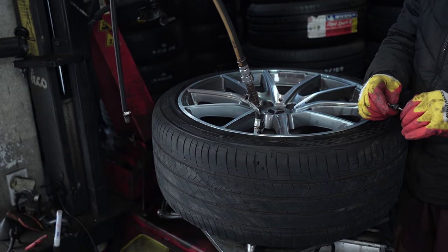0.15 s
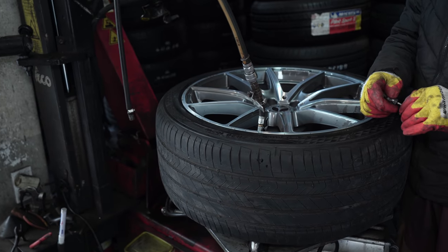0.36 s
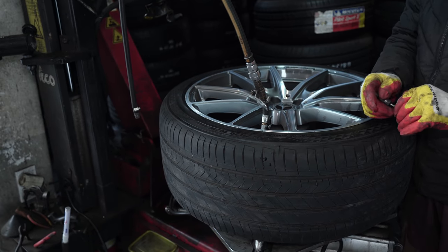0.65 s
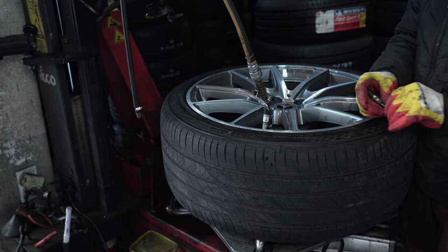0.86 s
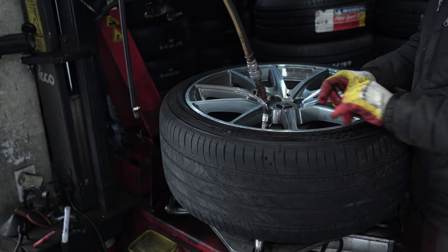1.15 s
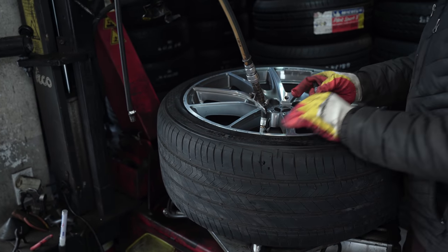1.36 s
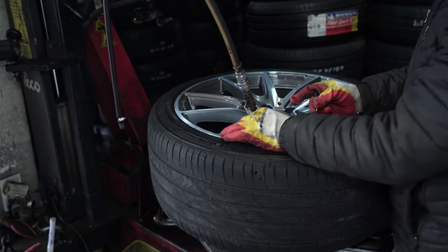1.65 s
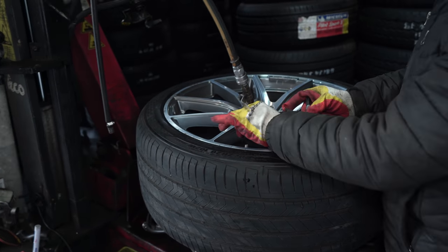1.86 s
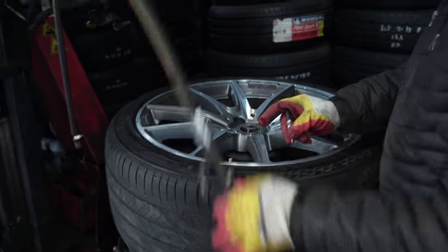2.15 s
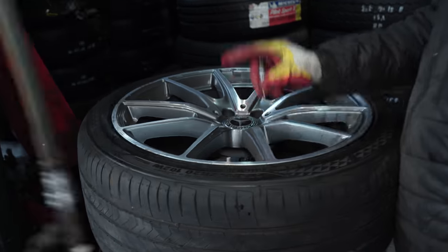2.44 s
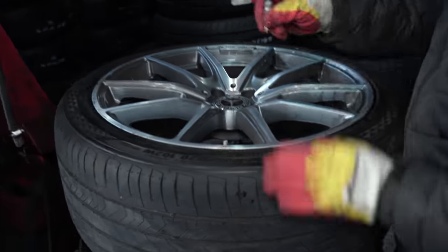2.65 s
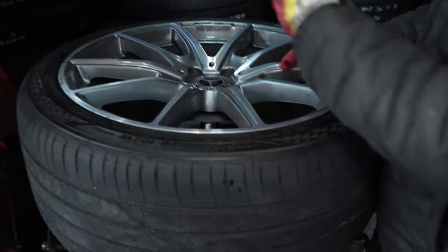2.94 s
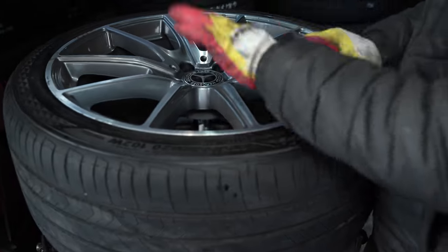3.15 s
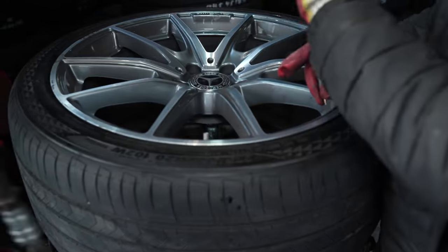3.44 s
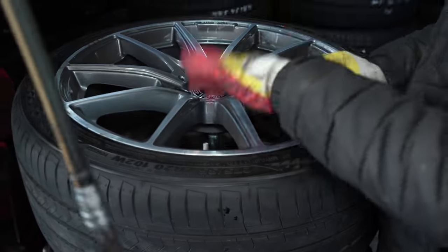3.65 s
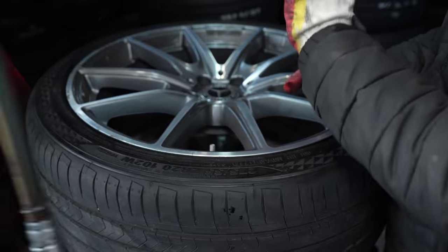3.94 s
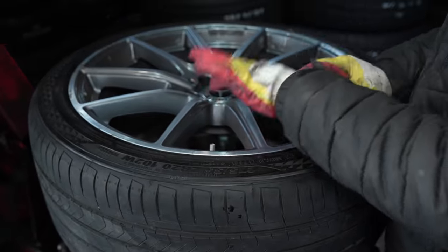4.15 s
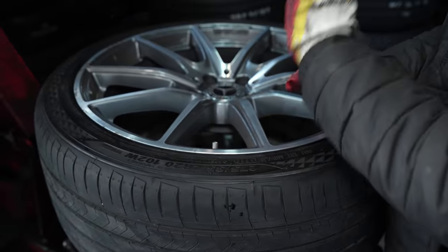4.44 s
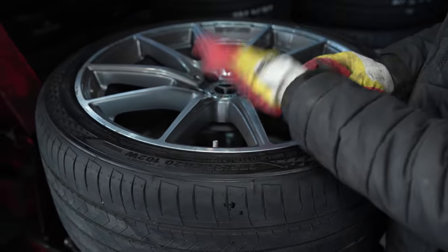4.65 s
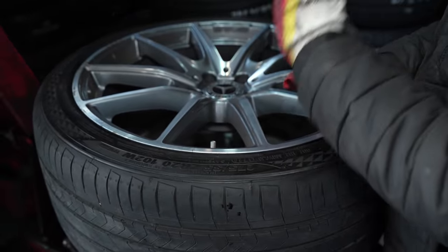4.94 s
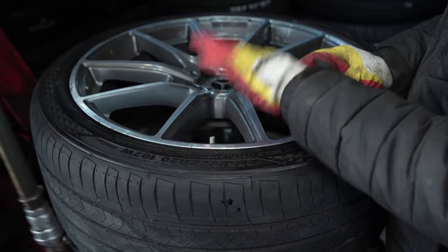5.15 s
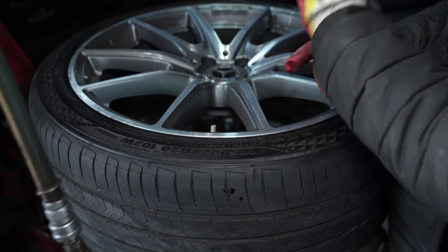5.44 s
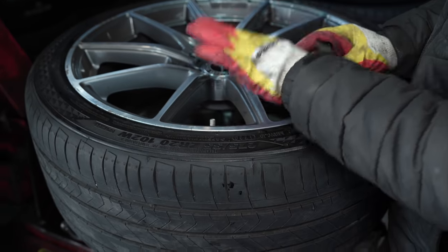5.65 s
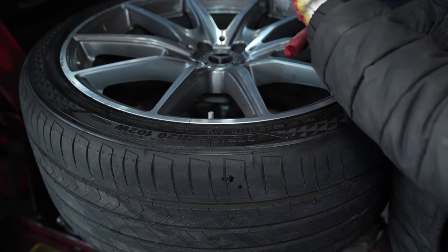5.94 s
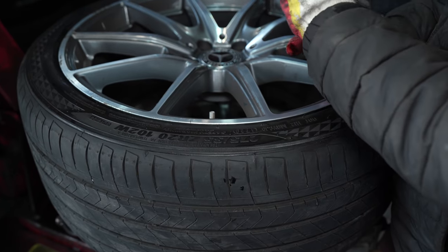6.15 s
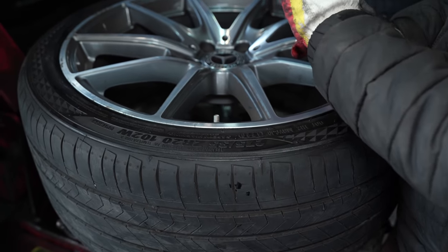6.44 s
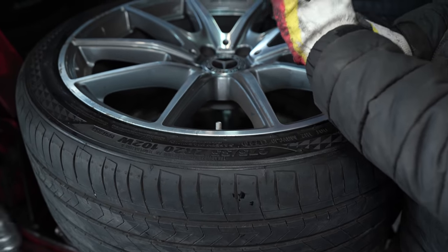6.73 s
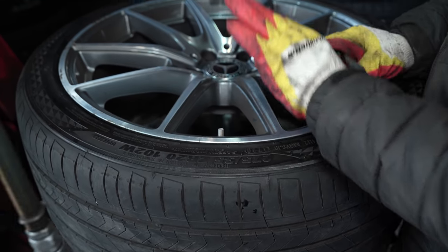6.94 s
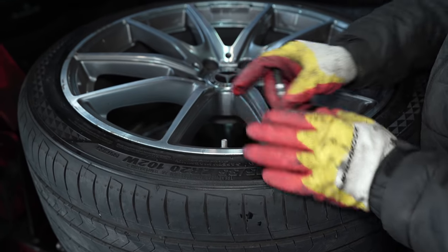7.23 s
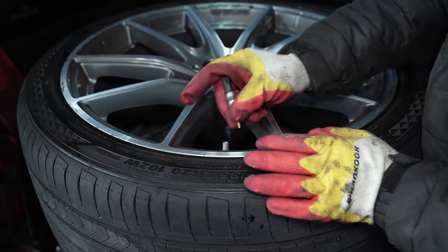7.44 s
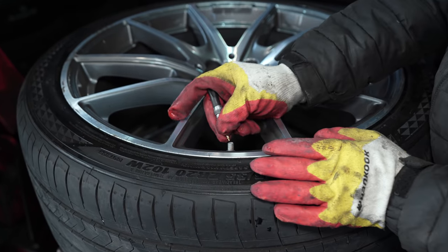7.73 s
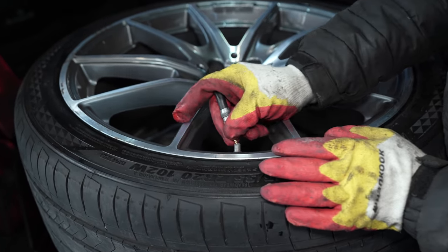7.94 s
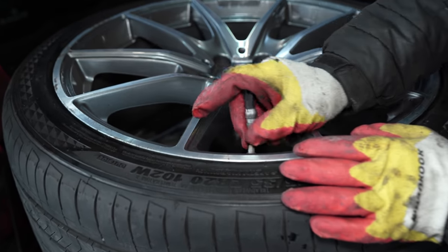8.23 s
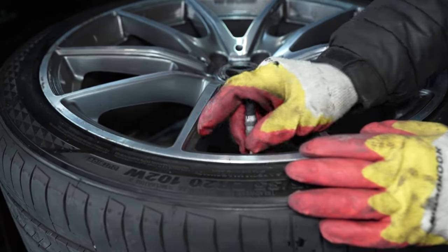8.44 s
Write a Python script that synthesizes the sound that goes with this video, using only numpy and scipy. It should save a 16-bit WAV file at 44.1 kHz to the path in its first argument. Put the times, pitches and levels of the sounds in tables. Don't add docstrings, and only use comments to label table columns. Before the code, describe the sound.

A close microphone catches a mid-low airy roar inside a tyre, with deep rumble behind and a growing leak. After nearly two seconds the seal bursts and a very bright, steady jet takes over while the workshop background sinks away. Repeated gloved passes break it into swishing pulses. A pause of plain hiss follows, then a tool meets the stem, dulls the jet slightly and closes it.

```python
import sys
import numpy as np
from scipy import signal
from scipy.fft import rfft, irfft
from scipy.io import wavfile
from scipy.ndimage import uniform_filter1d

SR = 44100
rng = np.random.default_rng(int(sys.argv[2]) if len(sys.argv) > 2 else 0)


def log_audio(samples):
    frames = np.atleast_2d(samples).T
    limited = np.clip(frames, -1, 1)
    pcm = np.round(limited * 32767).astype(np.int16)
    wavfile.write(sys.argv[1], SR, pcm)


def natural_amplitude(level_db):
    exponent = np.asarray(level_db, float) / 20
    return 10 ** exponent


N = 379260
TIME_S = np.arange(N) / SR
TICKS_S = np.arange(0, N / SR + .05, .004)
FRAMES_S = np.arange(N // 512 + 5) * 512 / SR
HZ = np.fft.rfftfreq(2048, 1 / SR)

# t/s, flow level/dB, chuck leak re flow/dB
FILL = [
    (0, -27, -22),
    (.3, -26.5, -17),
    (.8, -27, -17),
    (1.2, -27, -17),
    (1.5, -25.5, -12),
    (1.72, -25.5, -11),
    (1.8, -24.5, 4),
    (1.84, -24.5, 18),
    (1.9, -49, 15),
]
# f/Hz, density/dB per Hz
FILL_COLOUR = [(35, -29), (60, 1), (135, -7), (260, -4), (450, -2.5), (730, -2.5), (1600, -5.5),
               (2100, -10), (3200, -9.5), (5000, -18), (8000, -29), (13800, -40), (15900, -60)]
# f/Hz, density/dB per Hz
LEAK_COLOUR = [(1500, -25), (3000, 1), (5000, 4), (6500, -1), (8000, -13), (12000, -13), (16000, -14)]
# f/Hz, width/Hz, level/dB
TYRE_RING = [(253, 24, 7), (510, 44, 7), (1023, 24, 5), (1370, 50, 4), (2033, 36, 6), (2780, 60, 3)]
# f/Hz, width/Hz, level/dB
WHOOSH_RING = [(735, 90, 6)]
# f/Hz, width/Hz, level/dB
HOSE_MODES = [(1740, 200, 4), (2080, 300, -3), (5200, 260, 4), (6420, 120, 5)]

# start t/s, top t/s, end t/s, level/dB
THROB_SWELLS = [(-.1, .12, 0.26, -20), (0.28, 0.538, 0.88, -20), (.82, .98, 1.6, -29.5),
                (1.134, 1.76, 1.9, -15.5), (2.27, 2.75, 3.4, -31), (3.0, 3.4, 3.9, -38),
                (3.756, 3.93, 4.1, -37), (4.3, 4.46, 4.86, -49), (5.75, 6.45, 6.6, -41.5),
                (6.59, 6.82, 6.94, -44), (7.0, 7.2, 7.9, -42), (7.95, 8.39, 8.62, -35.5)]
# t/s, level/dB
DRONE_LOAD = [
    (0.0, -41),
    (0.69, -34),
    (0.84, -44),
    (1.15, -53),
    (1.68, -33),
    (1.9, -64),
    (6.8, -42),
    (7.4, -50),
    (8.6, -51),
]
# f/Hz, density/dB per Hz
SHOP_COLOUR = [(18, 2), (30, -4), (60, -19.5), (95, -3.5), (112, -45), (170, -9.5), (205, -4), (400, -10),
               (1000, -11.5), (4000, -25.5), (16000, -46.5)]

# t/s, pressure level/dB, centre of shrill band f/Hz
JET = [(1.7, -56, 12000), (1.76, -31, 11700), (1.81, -33, 11400), (1.85, -15, 11500), (1.88, -18, 11600),
       (2.1, -16, 11900), (2.62, -17, 12400), (2.71, -16.5, 12000), (3.15, -16.5, 12600),
       (3.6, -14.5, 11900), (4.1, -16, 12400), (5.5, -17, 12060), (6.6, -18, 12250), (7.55, -16, 12300),
       (7.62, -17, 12100), (8.37, -17, 11600), (8.45, -24.5, 11100), (8.6, -55, 11900)]
# f/Hz, density/dB per Hz
SHRILL_COLOUR = [(6000, -28.5), (8500, -17), (10000, -6), (11500, 0.5), (13000, 3), (14000, 1.5),
                 (15000, 2), (19000, -21)]
# f/Hz, density/dB per Hz
BODY_COLOUR = [(59, -65), (100, -58), (442, -23), (600, -22.5), (965, -14), (1170, -22.5), (1280, -13),
               (2550, -11.5), (4270, -1), (7420, -3), (9500, -1.5), (12400, -29), (20900, -120)]
# f/Hz, density/dB per Hz
CUPPED_COLOUR = [(100, -45), (200, -45), (600, -13.5), (1100, -16.5), (1900, -7), (3600, -2.5),
                 (5500, -3.5), (8200, -6.5), (9500, -18), (12400, -31)]
# f/Hz, density/dB per Hz
FIZZ_COLOUR = [(12000, -36.5), (14200, 3), (14900, 8), (16000, 4)]
# f/Hz, width/Hz, level/dB
STEM_MODES = [(2780, 110, 3), (3550, 110, 3), (4350, 200, 3.5), (5000, 200, 4), (6300, 450, 2),
              (7450, 450, -4.5), (8650, 450, 2), (9550, 140, 2), (10900, 500, 1.5), (13100, 700, 4.5),
              (14250, 400, -2), (14700, 150, 2)]
# f/Hz, width/Hz, level/dB
RESTING_HAND_MODES = [(12900, 560, -8), (12400, 880, 8.5), (4400, 200, -1), (5000, 200, -2.5)]
# from t/s, to t/s, delay/s, gain
HAND_ECHO = (2.0, 2.72, .00265, .3)
# from t/s, to t/s, f/Hz, width/Hz, level/dB
TOOL_NOTCH = (7.72, 4.5, 8000, 1500, -4)
# t/s, length/s, level/dB
TOOL_SEATING = (8.07, 0.22, 5)

# start t/s, stay/s, whoosh level/dB, spray level/dB, depth/dB per octave under 1.2 kHz
SWEEPS = [
    (1.82, 0.18, -36, -21, -2),
    (2.484, .07, -28.5, -27, 3),
    (3.13, 0.19, -24, -23, 0.7),
    (3.677, .15, -24.5, -18.5, 1.5),
    (4.139, .14, -24, -20.5, 0.5),
    (4.602, 0.15, -26, -17.5, -2),
    (5.096, 0.16, -26, -19.5, 0.5),
    (5.613, 0.15, -23, -21, -4.5),
]
# start t/s, stay/s, whoosh level/dB, spray level/dB, depth/dB per octave
APPROACHES = [
    (1.94, 0.073, -29.5, -33, -1.5),
    (2.6, .13, -37.5, -45, 7.5),
    (6.961, .05, -32.5, -40, 10.5),
    (7.05, 0.086, -32, -45, 0),
    (7.49, 0.063, -28.5, -27, -1.5),
    (7.62, 0.055, -33, -49, 3),
    (7.8, .05, -39, -30, -6),
    (8.11, 0.19, -41, -29.5, -10),
]
# f/Hz, density/dB per Hz
WHOOSH_COLOUR = [(60, -41), (140, -35.5), (300, -16.5), (500, -16), (1000, -4.5), (1500, -1.5), (2000, -2),
                 (2600, -5.5), (4000, -10), (8000, -66)]
# f/Hz, density/dB per Hz
SPRAY_COLOUR = [(1000, -23), (2000, -4.5), (2700, 1), (3600, 0.5), (5000, -5), (6000, -7.5), (8000, -8),
                (12000, -34)]
# t/s, level/dB, f/Hz, length/s
POPS = [
    (1.848, -11.5, 3830, 0.019),
    (2.031, -17.5, 3600, 0.019),
    (7.563, -28, 2580, 0.041),
    (7.81, -33, 3300, 0.081),
]
# from t/s, to t/s, f/Hz, level/dB
SQUEAKS = [
    (7.63, 7.73, 290, -46),
    (7.4, 7.58, 680, -47),
    (7.58, 7.73, 715, -43),
    (7.86, 8.01, 320, -44),
]
# t/s, low f/Hz, high f/Hz, level/dB
SPLITS = [(1.925, 8350, 10440, -28), (2.322, 5170, 7060, -33), (2.322, 8300, 9900, -33),
          (2.926, 7600, 9200, -38), (2.995, 9700, 11260, -32), (3.295, 7600, 9900, -28),
          (3.295, 13700, 15400, -30), (3.39, 9800, 12600, -22), (3.39, 14500, 16060, -31),
          (3.878, 11000, 14700, -23), (4.667, 6800, 9200, -29), (5.317, 7560, 9100, -35),
          (5.433, 7600, 9200, -33), (5.55, 9000, 12600, -26), (5.55, 14500, 16000, -31),
          (5.828, 4700, 6400, -34), (5.921, 4700, 5900, -35), (6.107, 11000, 12400, -27),
          (6.432, 13800, 16000, -27), (6.618, 11700, 13500, -24), (6.618, 5760, 7100, -34),
          (6.85, 11700, 14700, -24)]

FULL_PRESSURE_DB = -17
CUP_S, CUP_RISE_S = 7.56, 0.078


def evened(x):
    return x / np.sqrt(np.mean(x ** 2) + 1e-20)


def read(points, hz):
    f, value = np.transpose(points)
    return np.interp(np.log(hz + 1), np.log(f + 1), value)


def columns(rows, t):
    s, *rest = np.transpose(rows)
    return [np.interp(t, s, c) for c in rest]


def humps(modes):
    return sum(db / (1 + (2 * (HZ - f) / w) ** 2) for f, w, db in modes)


def window(t, from_s, to_s, fade_s):
    return np.clip(np.minimum(t - from_s, to_s - t) / fade_s, 0, 1)


def wander(rate_hz):
    hz = np.geomspace(.1 * rate_hz, rate_hz, num=24)[:, None]
    waves = np.sin(2 * np.pi * (hz * TICKS_S + rng.random(hz.shape))) / np.sqrt(hz)
    return np.interp(TIME_S, TICKS_S, evened(waves.sum(0)))


def hiss(shape_db, lo_hz, hi_hz, ripple_db, patchy_db, flicker_db):
    a, b, ripple, patches = rng.standard_normal((len(FRAMES_S), len(HZ), 4)).transpose(2, 0, 1)
    ripple = evened(uniform_filter1d(uniform_filter1d(ripple, size=110, axis=0), size=3, axis=1))
    patches = evened(uniform_filter1d(uniform_filter1d(patches, size=8, axis=0), size=40, axis=1))
    flicker = evened(uniform_filter1d(rng.standard_normal(len(FRAMES_S)), size=3))[:, None]
    size = natural_amplitude(shape_db + np.zeros(a.shape))
    band = (HZ > lo_hz) & (HZ < hi_hz)
    size = size / np.sqrt((size[:, band] ** 2).sum(1, keepdims=True))
    unrest = natural_amplitude(ripple_db * ripple + patchy_db * patches + flicker_db * flicker)
    z = (a + 1j * b) * size * unrest
    return signal.istft(z.T, nperseg=2048, noverlap=1536)[1][:N]


def fill():
    flow_db, leak_db = columns(FILL, TIME_S)
    roar_shape_db = read(FILL_COLOUR, HZ) + humps(TYRE_RING + HOSE_MODES)
    roar = hiss(roar_shape_db, 150, 2000, ripple_db=1.5, patchy_db=.8, flicker_db=.25)
    leak = hiss(read(LEAK_COLOUR, HZ), 4000, 9000, ripple_db=1.5, patchy_db=.5, flicker_db=.3)
    on = np.clip((1.875 - TIME_S) / 0.042, 0, 1)
    return on * natural_amplitude(flow_db) * (roar + natural_amplitude(leak_db - 7) * leak)


def shop():
    drop_db = -18.5 * np.clip((TIME_S - 1.83) / 0.21, 0, 1)
    creep_db = 5 * np.maximum(TIME_S - 7.1, 0)
    duck_db = drop_db + creep_db
    wash = hiss(read(SHOP_COLOUR, HZ), 70, 200, ripple_db=-0.3, patchy_db=2.0, flicker_db=-3.0)

    start, top, end, db = np.transpose(THROB_SWELLS)[..., None]
    arch = np.clip(np.minimum((TICKS_S - start) / (top - start), (end - TICKS_S) / (end - top)), 0, 1)
    swells = (natural_amplitude(db) * np.sin(np.pi / 2 * arch) ** 1.7).sum(0)
    throb = np.interp(TIME_S, TICKS_S, swells) + natural_amplitude(-50)
    throb_hz = 14.8 + .7 * wander(2.2)

    drone = natural_amplitude(columns(DRONE_LOAD, TIME_S)[0] + duck_db)
    drone_hz = 56.8 + 2.16 * wander(2.4)
    out = natural_amplitude(-45 + duck_db) * wash
    for size, hz in ((throb, throb_hz), (drone, drone_hz)):
        out += np.sqrt(2) * size * np.sin(2 * np.pi * np.cumsum(hz) / SR)
    return out


def obstacles(t):
    sweep_in_db_s, approach_in_db_s, out_db_s = 620, 103, 160
    linger_db, linger_db_s, linger_depth = -14.5, 68, 18
    s, stay, whoosh_db, spray_db, depth = np.transpose(SWEEPS + APPROACHES)[..., None]
    rise = np.repeat([sweep_in_db_s, approach_in_db_s], [len(SWEEPS), len(APPROACHES)])[:, None]
    before_db = rise * np.maximum(s - TICKS_S, 0)
    after_s = np.maximum(TICKS_S - s - stay, 0)
    part = (TICKS_S - s) / stay

    middle = np.sin(np.pi * np.clip(part, 0, 1)) ** 2
    edge_dip_db = -0.5 * middle
    whoosh = natural_amplitude(whoosh_db - before_db - out_db_s * after_s - edge_dip_db) ** 2 + 1e-30
    linger = natural_amplitude(whoosh_db + linger_db - before_db - linger_db_s * after_s) ** 2
    spray = natural_amplitude(spray_db - 70 * abs(part - .55) ** 3.1) ** 2 + 1e-30

    sag_db = columns(JET, TICKS_S)[0] - FULL_PRESSURE_DB
    rest_db = -42.5 + 0.25 * sag_db + 1 * np.clip((TICKS_S - CUP_S) / CUP_RISE_S, 0, 1)
    total = (whoosh + linger).sum(0) + natural_amplitude(rest_db) ** 2
    spray_total = spray.sum(0) + natural_amplitude(-32.5 + sag_db) ** 2

    full_cover_db, cover_fade_db = -16.5, 7
    cover = np.clip(4 + (10 * np.log10(whoosh.sum(0)) - full_cover_db) / cover_fade_db, 0, 1)
    mean_depth = (whoosh * depth + linger * linger_depth).sum(0) / total
    curves = (10 * np.log10(total), 10 * np.log10(spray_total), mean_depth, cover)
    return [np.interp(t, TICKS_S, c) for c in curves]


def jet():
    sag_hz, waver_hz = 604, 60
    waver = np.interp(FRAMES_S, TIME_S, wander(5))
    centre_hz = columns(JET, FRAMES_S)[1] - sag_hz * obstacles(FRAMES_S)[3] + waver_hz * waver
    pressure_db, cover = columns(JET, TIME_S)[0], obstacles(TIME_S)[3]
    sag_db = pressure_db - FULL_PRESSURE_DB

    t = FRAMES_S[:, None]
    cupped = np.clip((t - CUP_S) / CUP_RISE_S, 0, 1)
    rim_rise = np.clip((t - 2.3) / 1.3, .3, 1)
    resting = np.clip((t - 6.7) / .2, 0, 1)
    from_s, to_s, *notch = TOOL_NOTCH
    shaft = window(t, from_s, to_s, .08)
    rim_db = rim_rise * (1 - cupped) * (humps(STEM_MODES) + resting * humps(RESTING_HAND_MODES))

    steady = dict(ripple_db=2.2, patchy_db=.5, flicker_db=.3)
    shrill_shape_db = read(SHRILL_COLOUR, HZ * 13000 / centre_hz[:, None]) + rim_db
    shrill = hiss(shrill_shape_db, 6400, 13800, **steady)
    body_shape_db = (1 - cupped) * read(BODY_COLOUR, HZ) + cupped * read(CUPPED_COLOUR, HZ)
    body = hiss(body_shape_db + rim_db + shaft * humps([notch]), 3260, 6450, **steady)
    fizz = hiss(read(FIZZ_COLOUR, HZ), 14240, 15900, **steady)

    shrill_db = pressure_db - 1 * cover + .3 * wander(30)
    body_db = -25 + 0.64 * sag_db - 0.5 * cover - 4 * np.interp(TIME_S, FRAMES_S, cupped[:, 0])
    seat_s, length_s, swell_db = TOOL_SEATING
    seating_db = swell_db * np.exp(-(2 * (TIME_S - seat_s) / length_s) ** 2)
    fizz_db = -31 + .85 * sag_db + 2.5 * cover + 2.5 * wander(40) + seating_db

    on = np.clip((TIME_S - 1.72) / 0.017, 0, 1)
    out = on * (natural_amplitude(shrill_db) * shrill + natural_amplitude(body_db) * body + natural_amplitude(fizz_db) * fizz)
    from_s, to_s, delay_s, gain = HAND_ECHO
    near = window(TIME_S, from_s, to_s, 0.045)
    return out + gain * near * np.roll(out, round(delay_s * SR))


def strike():
    unrest = dict(ripple_db=1.8, patchy_db=.9, flicker_db=.4)
    whoosh_db, spray_db = obstacles(TIME_S)[:2]
    _, frame_spray_db, depth, _ = obstacles(FRAMES_S)
    depth_db = depth[:, None] * np.log2(np.maximum(1200 / (HZ + 150), 1))
    ring_db = .7 * humps(TYRE_RING) + humps(WHOOSH_RING)
    whoosh = hiss(read(WHOOSH_COLOUR, HZ) + depth_db + ring_db, 500, 2200, **unrest)
    climb = 1 + 0.016 * np.clip(frame_spray_db[:, None] + 21, -8, 8)
    spray = hiss(read(SPRAY_COLOUR, HZ / climb) + .5 * humps(STEM_MODES), 2400, 5200, **unrest)
    sound = natural_amplitude(whoosh_db) * whoosh + natural_amplitude(spray_db) * spray
    return sound * np.clip((TIME_S - 1.8) / .03, 0, 1)


def stem_contact():
    out, noise = np.zeros(N), rng.standard_normal(N)
    for s, db, hz, length_s in POPS:
        burst = signal.lfilter(*signal.butter(1, [.5 * hz, 1.46 * hz], "band", fs=SR), noise)
        out += natural_amplitude(db) * evened(burst) * np.exp(-(2 * (TIME_S - s) / length_s) ** 2)
    shake = evened(uniform_filter1d(uniform_filter1d(noise, size=900), size=900))
    for from_s, to_s, hz, db in SQUEAKS:
        on = window(TIME_S, from_s, to_s, .04)
        hum = np.sin(2 * np.pi * hz * TIME_S + .4 * shake)
        out += natural_amplitude(db) * on * (1 + .15 * shake) * hum
    return out


def splits():
    out, t = np.zeros(N), np.arange(-900, 900)
    noise = rfft(rng.standard_normal((len(SPLITS), len(t))))
    hz = np.fft.rfftfreq(len(t), 1 / SR)
    for (s, lo, hi, db), z in zip(SPLITS, noise):
        puff = evened(irfft(z * (hz > lo) * (hz < hi)))
        out[round(s * SR) + t] += natural_amplitude(db) * puff * signal.windows.tukey(len(t), .7)
    return out


def scene():
    return np.ones((2, 1)) * (fill() + shop() + jet() + strike() + stem_contact())


def top_cut(x):
    return signal.sosfilt(signal.butter(12, 16060, fs=SR, output="sos"), x)


def record(dry):
    x = np.tanh(dry / 1.15) * 1.15
    bass = signal.sosfiltfilt(signal.butter(2, [95, 185], "band", fs=SR, output="sos"), x)
    bass_db = 10 * np.log10(abs(uniform_filter1d(bass ** 2, size=1300)) + 1e-12)
    x = x - .8 * np.clip((-62.5 - bass_db) / 3, 0, 1) * bass
    x = x + np.array([[1], [-1]]) * splits()
    edge = signal.firwin(1023, 15760, window=("kaiser", 10), fs=SR)
    mix = signal.oaconvolve(x, edge[None], "same")
    return top_cut(mix)


dry = scene()
out = record(dry)
log_audio(out)
```